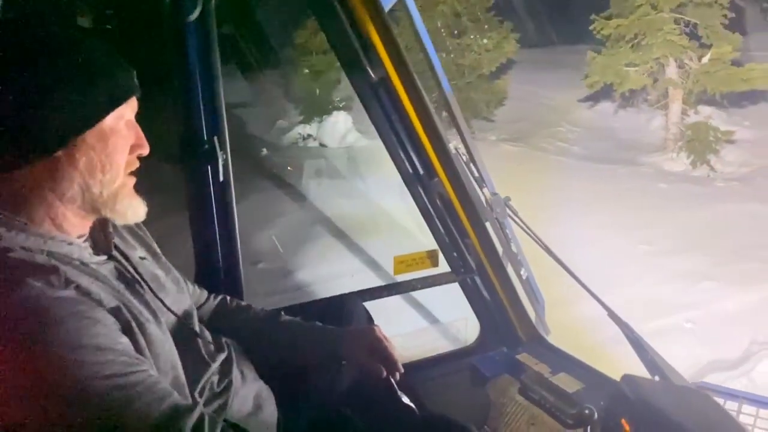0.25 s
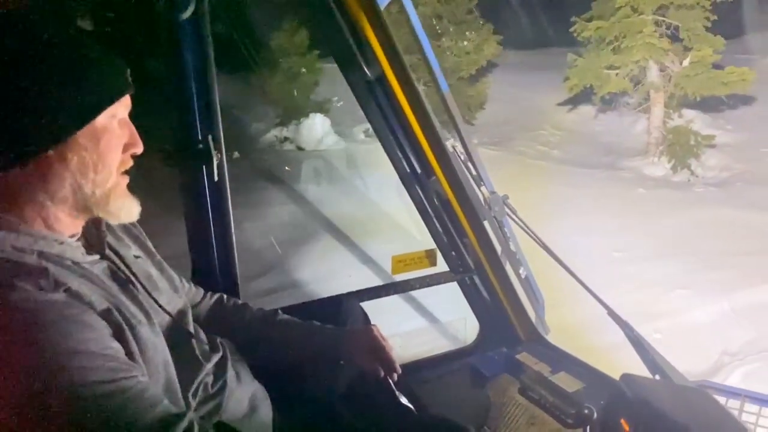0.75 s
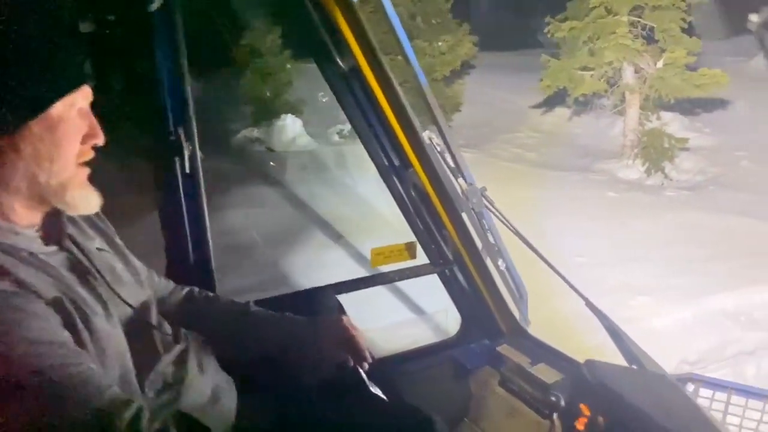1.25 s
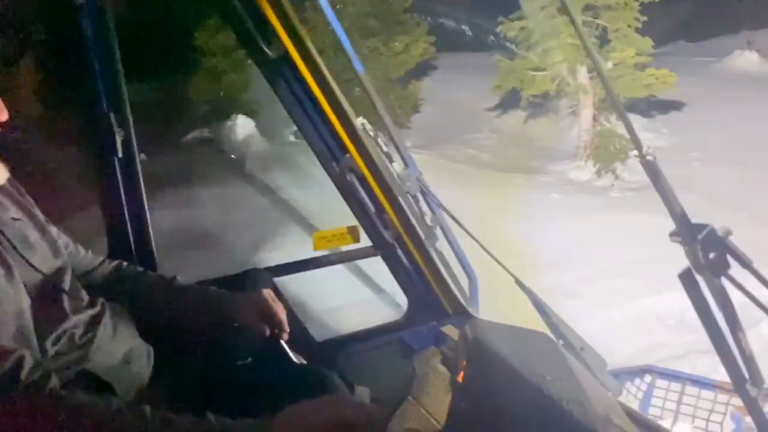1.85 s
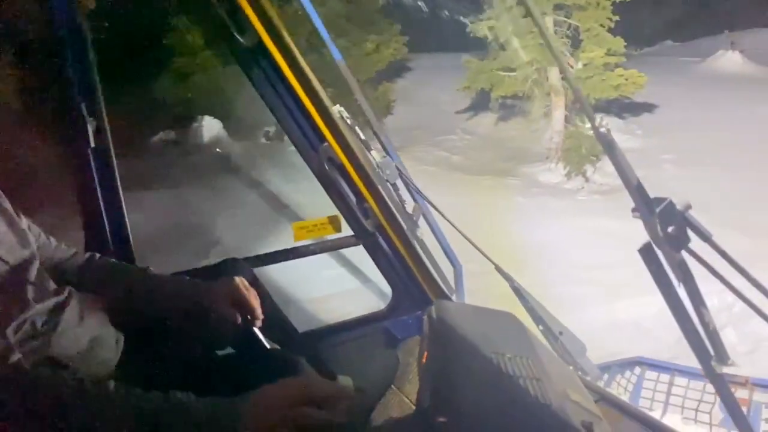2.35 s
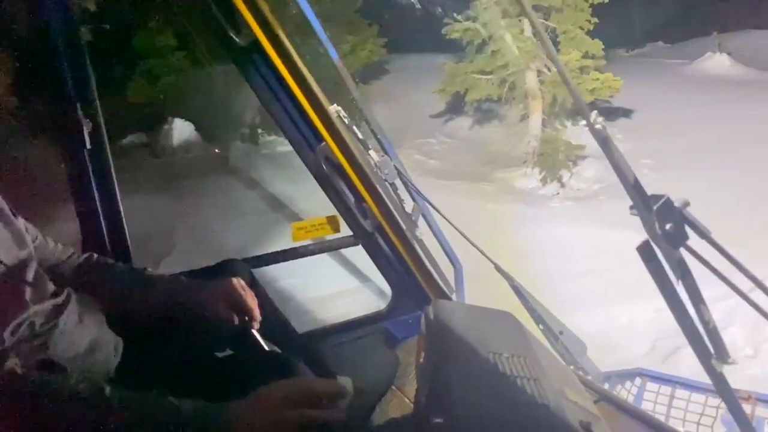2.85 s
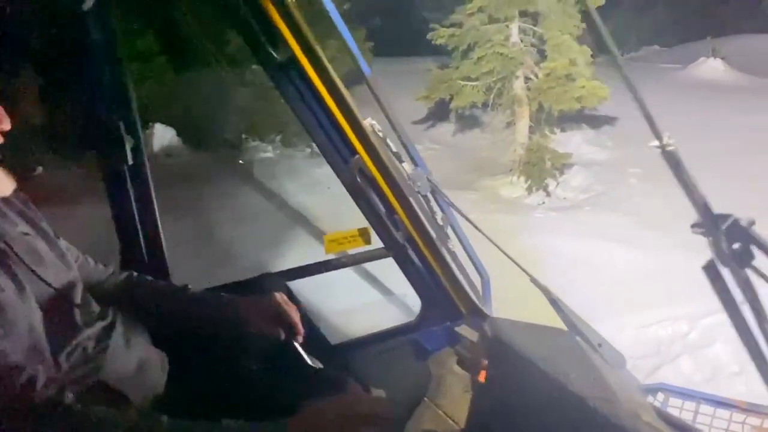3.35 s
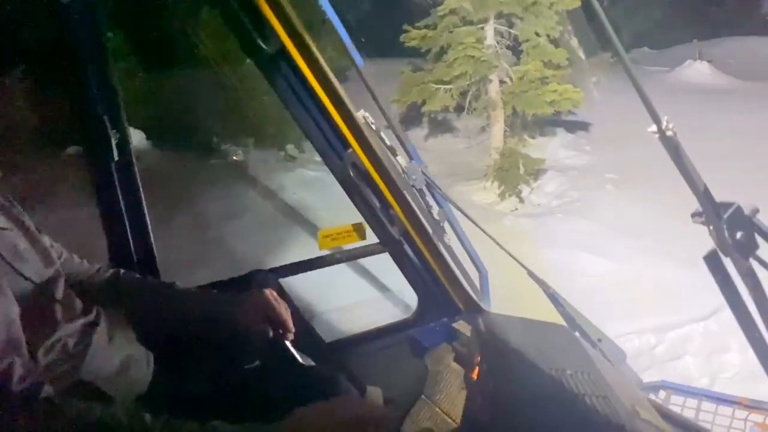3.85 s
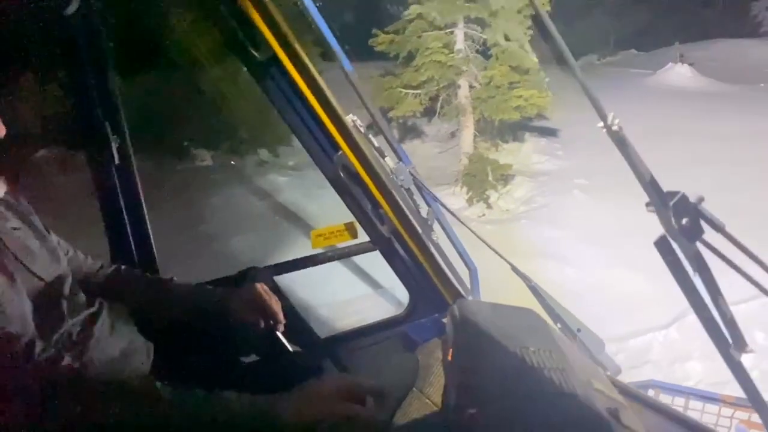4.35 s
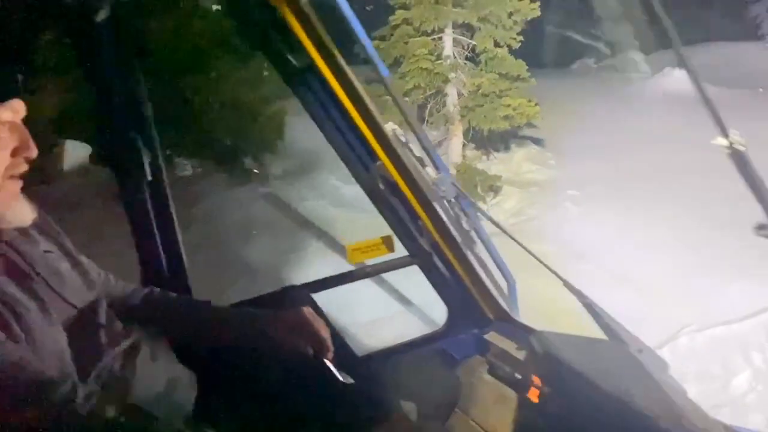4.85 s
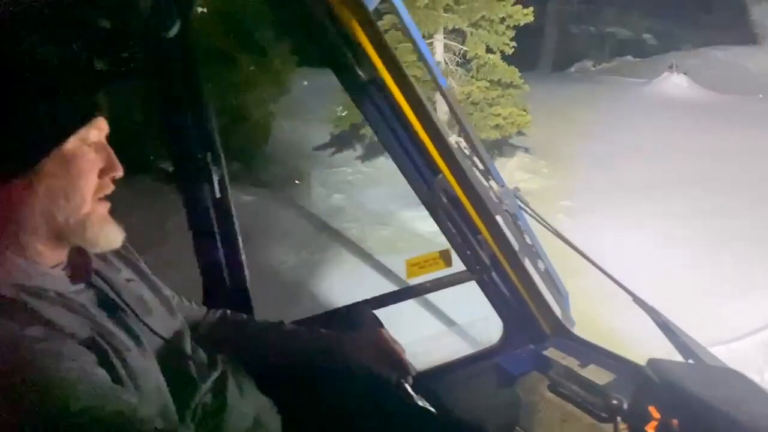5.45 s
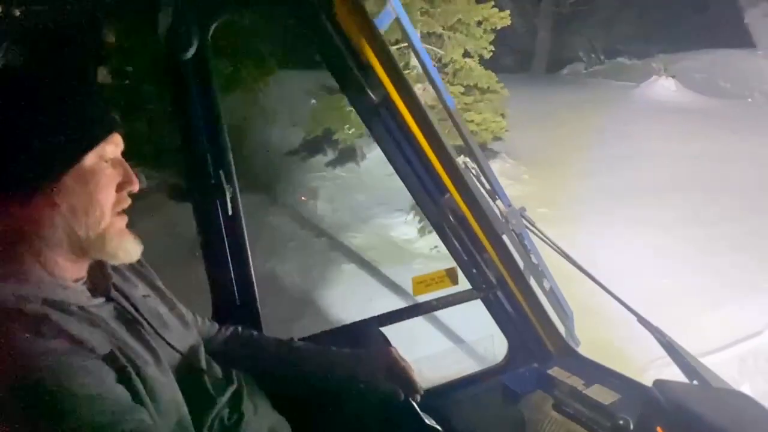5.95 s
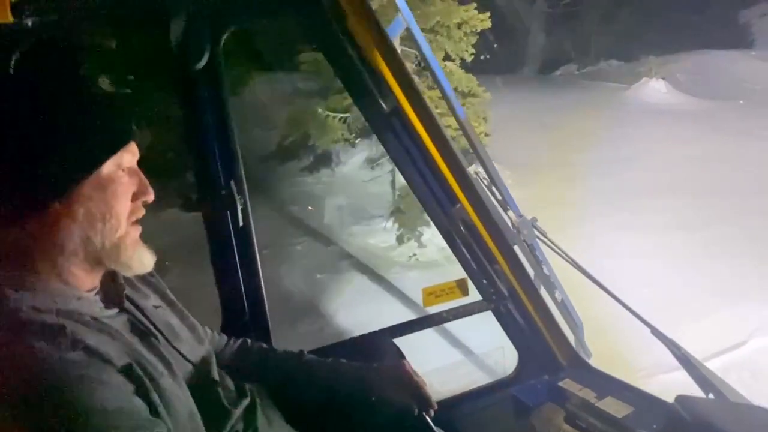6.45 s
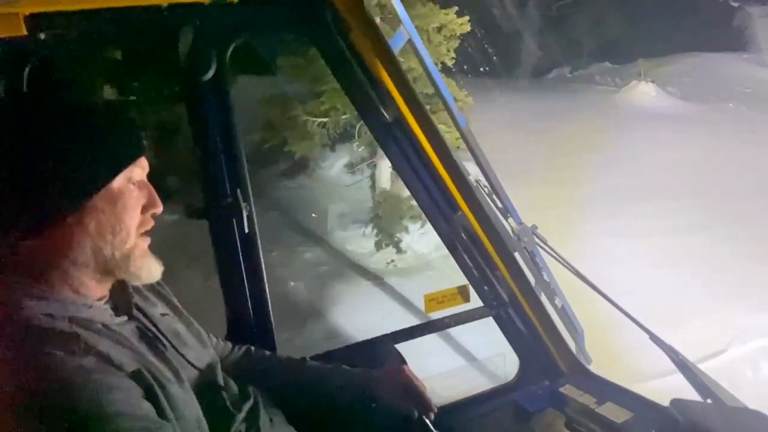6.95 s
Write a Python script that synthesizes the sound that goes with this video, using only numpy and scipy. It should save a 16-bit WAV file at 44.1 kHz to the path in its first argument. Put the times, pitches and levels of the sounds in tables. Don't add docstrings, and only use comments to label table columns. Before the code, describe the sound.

A steady low diesel drone fills an enclosed cab, knocking and clattering finely, with a faint whine and slow beating fans. Soft booms and thuds come through the floor. Cloth brushes close to the microphone, most often from two to six seconds, while a wiper motor hums underneath. Small switch clicks and a dull plastic panel knock come before the sharpest metallic snap, late in the stretch.

```python
import sys
import numpy as np
from scipy import signal
from scipy.fft import irfft
from scipy.io import wavfile
from scipy.ndimage import uniform_filter1d

SR = 44100
rng = np.random.default_rng(int(sys.argv[2]) if len(sys.argv) > 2 else 0)


def makeup_ratio(level_db):
    decades = np.asarray(level_db, float) / 20
    return 10 ** decades


def generate_wav(sig):
    pcm = np.round(np.clip(np.atleast_2d(sig).T, -1, 1) * 32767).astype(np.int16)
    wavfile.write(sys.argv[1], SR, pcm)


N = 317079
T = np.arange(N) / SR
COARSE_S = T[::16]

# time_s, speed_rpm
ENGINE_SPEED = [(0.0, 2088), (0.3, 2093), (1.3, 2097), (2.1, 2084), (2.9, 2082), (3.45, 2069), (4.1, 2079),
                (4.6, 2081), (5.1, 2065), (6.0, 2051), (6.6, 2074), (6.9, 2080), (7.19, 2080)]
# time_s, load_0_to_1
ENGINE_LOAD = [(0, 0.35), (1.5, 0), (2, 0.6), (2.5, 1), (3.3, 0.86), (4, 0.96), (4.6, 1), (5.2, 0.9),
               (5.55, 0.75), (5.8, 0.16), (6, 0.3), (7.19, 0.06)]
MEAN_RPM = 2080
FIRING, PUMP, EXHAUST = 6, 22, 9
# light_load_db, heavy_load_db, slope_db_per_10rpm, waver_db
MAIN_TONES = [
    (-23, -25, 1, 0.5),
    (-28, -31, -0.2, 1.05),
    (-29.5, -35, 0.7, 1.2),
]
# cycle_multiple, light_load_db, heavy_load_db
ENGINE_HARMONICS = [(1, -41, -47), (2, -34, -34), (4, -40, -41), (5, -44, -45), (7, -40, -38),
                    (8, -37, -36), (10, -42, -38), (11, -40, -39), (12, -45, -37), (13, -57, -47),
                    (14, -47, -44), (15, -39, -40), (16, -42, -54), (18, -44, -40), (20, -45, -32),
                    (21, -39, -41), (27, -49, -50), (28, -49, -51), (30, -46, -43), (31, -49, -56),
                    (32, -47, -42), (34, -48, -49), (38, -48, -41), (40, -56, -45), (41, -48, -46),
                    (42, -54, -46), (47, -53, -47), (56, -56, -48)]
# cycle_multiple, light_load_db, heavy_load_db
VALVE_TONES = [(39, -54, -46), (43, -51, -48), (44, -55, -47)]
VALVE_LOWEST, VALVE_HIGHEST, VALVE_KNOCK_S = 38, 44, 4.31
# pitch_hz, width_hz, level_db
BLOCK_MODES = [(570, 230, 0), (606, 72, -1.5), (737, 120, -6), (958, 22, -10.5), (1174, 41, -7.5),
               (1268, 29, -7.5), (1340, 190, -12), (1521, 46, -11), (1694, 46, -18), (2118, 53, -17),
               (2197, 22, -18.5), (2550, 48, -34), (2880, 36, -17)]

# cycle_multiple, light_load_db, heavy_load_db
CLATTER_LINES = [(26, -50, -52), (33, -49, -52), (49, -56, -53), (54, -55, -55), (58, -64, -55),
                 (60, -66, -54), (66, -54, -55), (68, -55, -56), (70, -56, -55), (71, -58, -60),
                 (72, -57, -58), (75, -58, -60), (77, -56, -59), (78, -56, -60), (79, -58, -62),
                 (80, -58, -61), (81, -58, -60), (82, -57, -62), (84, -57, -59), (87, -63, -59),
                 (88, -61, -58)]
FINE_LOWEST, FINE_END = 92, 150
FINE_LIGHT_DB, FINE_HEAVY_DB, FINE_SPREAD_DB = -68, -65, 3

# time_s, level_db
WHINE_DRIVE = [(0, -45), (1.6, -46), (2.2, -52), (3.6, -48), (4.5, -48), (4.95, -52), (5.2, -42),
               (5.45, -44), (5.68, -54), (5.85, -41), (6.1, -42), (6.4, -41), (6.75, -43), (7.19, -46)]
WHINE_MULTIPLES = 63, 64, 65
WHINE_PANEL_HZ, WHINE_PANEL_WIDTH_HZ = 1102, 9

# time_s, lead_turns
FAN_TURNS = [(-.05, 0), (3.98, 8), (7.3, 14)]
SLOW_FAN_HZ = 61.1

# time_s, level_db
WIPER_EFFORT = [(1.2, -45), (1.8, -28), (2.3, -24), (2.6, -20), (2.8, -24.5), (3.12, -21), (3.33, -23.5),
                (3.7, -21), (4.15, -20.5), (4.35, -23.5), (4.67, -18), (4.85, -22.5), (5.05, -19.5),
                (5.3, -27), (5.47, -20), (5.62, -24), (5.8, -32), (6.1, -40)]
WIPER_FREE_HZ, WIPER_SAG_HZ, WIPER_SLOWEST_S, WIPER_SAG_S = 189.6, 3.8, 3.95, 1.3
WIPER_OCTAVE_DB = -16.5

# time_s, peak_db, low_hz, high_hz, t60_s
TICKS = [(.008, -32, 1100, 3480, 0.03), (.912, -33, 10800, 11800, .03), (.9165, -32, 2300, 4600, .06),
         (.915, -31, 1500, 15000, 0.14), (.9255, -28, 2600, 4500, 0.045), (1.009, -33, 10800, 12500, .015),
         (1.999, -29, 6000, 11000, .02), (2.018, -27, 6500, 15000, .02), (2.0352, -18, 4200, 8500, 0.0089),
         (2.037, -33, 3000, 9000, 0.033), (2.092, -26, 12000, 15700, .01), (2.14, -28, 5000, 9000, .006),
         (2.204, -24, 1700, 2050, .05), (2.208, -31, 2000, 3000, .04), (2.685, -32, 10500, 15700, .12),
         (2.96, -25, 600, 1000, 0.07), (2.96, -28, 1000, 1600, .07), (2.961, -30, 1700, 3500, .07),
         (5.409, -28, 1890, 3200, 0.08), (5.615, -27, 1600, 2600, .09), (6.023, -24.5, 3500, 15500, 0.11),
         (6.027, -23, 1100, 3200, .07), (6.355, -24, 6000, 15500, .09), (6.357, -17.5, 1600, 15500, 0.1),
         (6.37, -10, 2300, 10000, 0.048), (6.372, -20, 9000, 15700, 0.042),
         (6.375, -13.5, 1600, 11000, 0.058), (6.377, -23.5, 1500, 2020, 0.07), (.918, -35, 1200, 2000, .12),
         (.921, -31, 3600, 4600, .04), (.9165, -32, 3500, 6000, .07), (.913, -33, 7800, 8600, .05),
         (6.3735, -15, 8800, 10200, .03), (2.207, -29, 1550, 2050, .06), (5.408, -25, 2200, 2450, .07)]
# time_s, level_db, low_hz, high_hz
CONTACTS = [(.0074, -4, 900, 3300), (.0076, -13, 3000, 6500), (2.0357, -2, 3900, 5500),
            (2.0358, -6, 9200, 11800), (2.0356, 4, 5600, 8600), (2.0355, 3, 12300, 15600),
            (2.1395, -8, 5000, 6500), (2.1395, -11, 7000, 9200), (2.0925, -14, 12500, 15700),
            (6.3702, -2, 2300, 14000), (6.3745, -5, 3000, 11000), (6.357, -12, 3000, 12000)]
# pitch_hz, tapped_db, snapped_db, t60_s
CATCH_MODES = [(1600, -1, -1, 0.054), (1704, -4, 2.5, 0.044), (2110, -12, -2, 0.053), (2200, -14, -1, .05),
               (2740, -14, -5, .05), (2470, -4, -2.5, 0.075), (2690, -5, -9, 0.062), (3000, -6, 3, 0.04),
               (3140, 1, -4, 0.05), (3370, 0.5, -4, 0.039), (3576, 3, 3, 0.045), (4160, -2, 1, 0.047),
               (4870, -10, -9, 0.05), (6420, -7, 1, 0.066), (6950, -10, 2, 0.04), (7560, -14, -1, 0.054),
               (8100, -7, -6, 0.039), (8250, -12, -3, 0.046), (9570, -9, -14, 0.064),
               (9600, -18, -13, 0.032)]
# time_s, level_db, snapped_0_or_1
CATCH_HITS = [
    (.913, -41, 0),
    (.9165, -30.5, 0),
    (.926, -38, 0),
    (6.358, -32, 1),
    (6.37, -25.5, 1),
    (6.374, -28, 1),
    (6.378, -34, 1),
]
# pitch_hz, level_db, t60_s
PANEL_MODES = [(645, -4, 0.12), (720, 3, .025), (770, -3, .04), (1420, -6, .015), (850, -3.5, 0.068),
               (1032, -3, 0.093), (1290, -6, 0.046), (1400, -6.5, 0.072), (1776, -14, .05),
               (2230, -16, .05)]
# time_s, level_db
PANEL_HITS = [
    (2.9614, -17),
    (2.967, -26),
    (2.9715, -25),
]
# pitch_hz, level_db, t60_s
SWITCH_MODES = [(1080, -21, .016), (1310, -19, .018), (1850, -21, .014), (2150, -26, .011),
                (3000, -23, .018), (5200, -30, .008)]
SWITCH_S = .0076

# pitch_hz, level_db_per_hz
CLOTH_SPECTRUM = [(880, -24), (1500, -10), (1980, -0.5), (2250, -6.5), (4000, -5.5), (5100, -5.5),
                  (6700, -2.5), (8600, -3.5), (11900, -9), (14900, -4.5), (16000, -5)]
# peak_s, level_db, rise_s, fall_s
CLOTH_STROKES = [(.056, -37.5, 0.22, 0.12), (.43, -44.5, 0.33, .08), (.56, -43.5, .12, .06),
                 (.68, -50, .1, .02), (1.35, -50, .15, .03), (1.68, -50, 0.54, .1),
                 (1.794, -42.5, 0.086, .08), (2.02, -41, 0.14, 0.036), (2.24, -36.5, 0.15, 0.097),
                 (2.32, -37, 0.033, 0.21), (2.53, -38, .1, 0.37), (2.69, -42.5, .05, .07),
                 (2.84, -35.5, 0.095, 0.27), (3.28, -36.5, 0.039, 0.089), (3.34, -34.5, .1, 0.35),
                 (3.85, -43, 0.19, 0.059), (3.94, -42.5, .07, 0.058), (4.04, -43, .04, .055),
                 (4.16, -48, .08, .04), (4.56, -44.5, 1.1, 0.14), (4.69, -41.5, .05, .08),
                 (4.75, -36.5, 0.088, .13), (5.13, -40, 0.13, 0.42), (5.49, -38, 0.25, 0.083),
                 (5.62, -36, 0.054, 0.13), (5.7, -44, .08, 0.056), (5.88, -39.5, 0.12, 0.087),
                 (6.02, -39, .09, 0.17), (6.78, -33, 0.15, 0.1), (6.858, -39, .1, 0.031),
                 (6.99, -46, .06, 0.089), (3.49, -41, .05, .05), (4.8, -43, .03, 0.028)]
# time_s, level_db
SHORT_SCUFFS = [(.272, -50), (1.01, -47), (1.072, -46), (2.09, -47), (4.22, -50), (6.252, -44), (6.34, -41),
                (7.041, -46), (7.185, -48)]
# time_s, tilt_db
SLEEVE_TILT = [(0, 6), (.08, 0), (.6, -1.5), (2.0, 0.5), (4.3, 0), (5.6, 2), (6.1, 2.5), (6.6, -2.5),
               (7.19, 4.5)]
SCUFF_RISE_S, SCUFF_FALL_S, CLOTH_BED_DB = 0.01, .025, -62
STROKE_DB = 12
ROUND_TOP = 0.15

# time_s, level_db, length_s
TRACK_THUDS = [(.51, -19, .08), (.99, -23, .12), (1.46, -29, .1), (1.8, -34, .4), (2.42, -24, .08),
               (2.7, -30, .5), (3.58, -22, .12), (4.41, -18, .3), (4.66, -21, .1), (4.815, -11, 0.05),
               (5.06, -19, .12), (5.328, -20, .08), (5.51, -21, .08), (6.23, -29, .2), (6.47, -27, .12),
               (7.05, -28, .4)]
# time_s, level_db, length_s
FLOOR_BOOMS = [(.1, -20, 1), (.66, -21, 0.15), (0.947, -22, 0.092), (1.34, -25.5, .2), (1.652, -23, .3),
               (1.905, -17.5, 0.17), (2.31, -20.5, .15), (2.6, -24, 0.7), (3.263, -20, 0.11),
               (3.573, -21, 0.1), (4.35, -26, 0.59), (4.73, -27, .07), (4.93, -24, 0.13),
               (5.255, -15, 0.14), (5.43, -26, .08), (5.57, -19, 0.091), (6.23, -21, 0.22),
               (6.41, -22, .06), (6.85, -25, 0.55)]
THUD_BED_DB, BOOM_BED_DB, FLOOR_DB = -45, -30.5, -2.5

# pitch_hz, level_db_per_hz
ROAR_SPECTRUM = [(14, -31), (40, -11.5), (85, -17.5), (125, -5.5), (190, -12.5), (230, -17.5), (370, -17),
                 (420, -21), (680, -23.5), (850, -30.5), (1030, -32), (1150, -31), (1400, -33.5),
                 (1600, -39), (2700, -40.5), (4200, -52.5)]
# pitch_hz, level_db_per_hz
AIR_SPECTRUM = [(2060, -28), (3500, -1), (4490, -2), (6740, -0.5), (12200, -9.5), (14500, -4), (15200, -5),
                (16000, -11)]
AIR_DB = -47.5
EDGE_HZ = 15870


def evened(x):
    return x / np.sqrt(np.mean(x ** 2) + 1e-20)


def steadied(x):
    return evened(x / (uniform_filter1d(x ** 2, size=3000) + 0.11) ** 0.5)


def curves(rows, t=T):
    s, *columns = np.transpose(rows)
    return [np.interp(t, s, c) for c in columns]


def drift(rate_hz, count):
    steps_s = np.arange(int(N / SR * rate_hz) + 3) / rate_hz
    return [np.interp(T, steps_s, row) for row in rng.standard_normal((count, len(steps_s)))]


def add(mix, s, sound):
    part = mix[round(s * SR):][:len(sound)]
    part += sound[:len(part)]


def tone(cycles, db):
    return np.sqrt(2) * makeup_ratio(db) * np.sin(2 * np.pi * cycles)


def resonate(x, hz, width_hz):
    r = np.exp(-np.pi * width_hz / SR)
    pole = r * np.exp(2j * np.pi * min(hz, .45 * SR) / SR)
    return 2 * signal.lfilter([1 - r], [1, -pole], x).real


def ring_modes(hz, db, t60_s, start_cycles):
    t = np.arange(6000)[:, None] / SR
    onset = np.minimum(t / 0.00067, 1)
    modes = makeup_ratio(db - 60 * t / t60_s) * np.sin(2 * np.pi * (hz * t + start_cycles))
    return (modes * onset).sum(axis=1)


def bandpass(x, low_hz, high_hz):
    return signal.sosfilt(signal.butter(3, [low_hz, high_hz], "band", fs=SR, output="sos"), x)


def noise(spectrum, size, patchy_db, shape_db=None):
    hop, hz = size // 4, np.fft.rfftfreq(size, 1 / SR)
    a, b, patches = rng.standard_normal((N // hop + 6, len(hz), 3)).T
    patches = uniform_filter1d(patches, size=9, axis=0)
    patches = evened(uniform_filter1d(patches, size=9, axis=1))
    f, level_db = np.transpose(spectrum)
    colour_db = np.interp(np.log(hz + 1), np.log(f + 1), level_db, left=-70, right=-90)
    db = colour_db[:, None] + patchy_db * patches
    if shape_db:
        db = db + shape_db(hz[:, None], np.arange(db.shape[1]) * hop / SR)
    return evened(signal.istft((a + 1j * b) * makeup_ratio(db), nperseg=size, noverlap=size - hop)[1][:N])


def strokes(rows, bed_db):
    power = makeup_ratio(bed_db) ** 2
    for s, db, rise_s, fall_s in rows:
        away = np.maximum((s - COARSE_S) / rise_s, (COARSE_S - s) / fall_s)
        away = np.hypot(away, ROUND_TOP) - ROUND_TOP
        power = power + makeup_ratio(db - STROKE_DB * away) ** 2
    return np.interp(T, COARSE_S, np.sqrt(power))


def engine_state():
    rpm = curves(ENGINE_SPEED)[0]
    load = np.clip(curves(ENGINE_LOAD)[0], 0, 1)
    return rpm, load, np.cumsum(rpm) / 120 / SR


def engine():
    rpm, load, cycle = engine_state()
    firing_db, pump_db, exhaust_db = [
        light_db + load * (heavy_db - light_db) + slope_db * (rpm - MEAN_RPM) / 10 + waver_db * w
        for (light_db, heavy_db, slope_db, waver_db), w in zip(MAIN_TONES, drift(3.0, count=3))]
    pump_db = pump_db + 0.71 * load * drift(16.0, count=1)[0]
    out = tone(FIRING * cycle, firing_db) + tone(PUMP * cycle, pump_db) + tone(EXHAUST * cycle, exhaust_db)
    rows = list(ENGINE_HARMONICS) + list(VALVE_TONES)
    wander, start = drift(6.0, count=len(rows)), rng.random(len(rows))
    for (k, light_db, heavy_db), w, phase in zip(rows, wander, start):
        if VALVE_LOWEST <= k <= VALVE_HIGHEST:
            phase = .25 - k * cycle[round(VALVE_KNOCK_S * SR)] + .2 * w
            w = .25 * wander[-1] + .8 * w
        unsteady_db = (1 + k / 40) * w
        out += tone(round(k) * cycle + phase, light_db + load * (heavy_db - light_db) + unsteady_db)
    return out


def block_knock():
    _, load, cycle = engine_state()
    firing = np.floor(cycle * FIRING).astype(int)
    at = np.flatnonzero(np.diff(firing)) + 1
    strength = makeup_ratio(2.0 * rng.standard_normal(len(at)))
    delay = rng.integers(0, 3, len(at))
    paths = rng.standard_normal((FIRING, 900)) * np.exp(-np.arange(900) / 260.)
    knocks = np.zeros(N)
    for c, cylinder_db in enumerate([0, -3, -1.5, -4, -1.2, -3]):
        train = np.zeros(N)
        mine = firing[at] % FIRING == c
        train[at[mine] - delay[mine]] = strength[mine]
        knocks += makeup_ratio(cylinder_db) * signal.oaconvolve(train, paths[c])[:N]
    ringing = np.zeros(N)
    for hz, width_hz, db in BLOCK_MODES:
        ringing += makeup_ratio(db) * evened(resonate(resonate(knocks, hz, width_hz), hz, 2 * width_hz))
    return makeup_ratio(-38.0 + 1.2 * load) * evened(ringing)


def clatter():
    _, load, cycle = engine_state()
    multiples = range(FINE_LOWEST, FINE_END)
    spread_db = FINE_SPREAD_DB * rng.standard_normal(len(multiples))
    fine = [(k, FINE_LIGHT_DB + d, FINE_HEAVY_DB + d) for k, d in zip(multiples, spread_db)]
    k, *levels_db = np.transpose(list(CLATTER_LINES) + fine)
    lines = np.zeros((2, 2, 2049), complex)
    phases = np.exp(2j * np.pi * rng.random((2, len(k))))
    lines[:, :, k.astype(int)] = makeup_ratio(np.array(levels_db))[:, None] * phases
    cycles = irfft(lines) * 4096 / np.sqrt(2)
    grid = np.arange(4096) / 4096
    (light_a, light_b), (heavy_a, heavy_b) = [
        [np.interp(cycle % 1, grid, one, period=1) for one in pair] for pair in cycles]
    blend = .35 * drift(2.5, count=1)[0]
    version_a = light_a + load * (heavy_a - light_a)
    version_b = light_b + load * (heavy_b - light_b)
    return np.cos(blend) * version_a + np.sin(blend) * version_b


def whine():
    rpm, _, cycle = engine_state()
    drive_db = curves(WHINE_DRIVE)[0]
    out = np.zeros(N)
    for k, flutter in zip(WHINE_MULTIPLES, drift(8.0, count=3)):
        detuning = (k * rpm / 120 - WHINE_PANEL_HZ) / WHINE_PANEL_WIDTH_HZ
        off_db = 10 * np.log10(1 + detuning ** 2)
        out += tone(k * cycle, drive_db - off_db + 1.5 * flutter)
    return out


def fans():
    slow = SLOW_FAN_HZ * T
    gained = curves(FAN_TURNS)[0] + .5
    a, b = drift(1.0, count=2)
    return tone(slow, -27.5 + a) + tone(slow + gained, -27 + b)


def wiper():
    hz = WIPER_FREE_HZ - WIPER_SAG_HZ * np.exp(-((T - WIPER_SLOWEST_S) / WIPER_SAG_S) ** 2)
    db = curves(WIPER_EFFORT)[0]
    turns = np.cumsum(hz) / SR
    octave = tone(2 * turns, db + WIPER_OCTAVE_DB)
    return octave + tone(turns, db + 1.5 * drift(26.0, count=1)[0])


def clicks():
    out, t = np.zeros(N), np.arange(6000) / SR
    hisses = rng.standard_normal((len(TICKS), len(t)))
    for (s, db, low_hz, high_hz, t60_s), hiss in zip(TICKS, hisses):
        gain = makeup_ratio(db - 6 - 60 * t / t60_s) * np.minimum(t / .0002, 1)
        add(out, s, gain * evened(bandpass(hiss, low_hz, high_hz)))
    for s, db, low_hz, high_hz in CONTACTS:
        add(out, s, makeup_ratio(db) * bandpass(1. * (t == 0), low_hz, high_hz))
    hz, tap_db, snap_db, t60_s = np.transpose(CATCH_MODES)
    for s, db, snapped in CATCH_HITS:
        mode_db = snap_db if snapped > .5 else tap_db
        add(out, s, ring_modes(hz, db + mode_db, t60_s, rng.random(len(hz))))
    add(out, SWITCH_S, ring_modes(*np.transpose(SWITCH_MODES), 0))
    hz, mode_db, t60_s = np.transpose(PANEL_MODES)
    for s, db in PANEL_HITS:
        add(out, s, ring_modes(hz, db + mode_db, t60_s, .5 + .1 * rng.random(len(hz))))
    return out


def rustle():
    scuffs = [(s, db, SCUFF_RISE_S, SCUFF_FALL_S) for s, db in SHORT_SCUFFS]

    def tilt_db(hz, t):
        return curves(SLEEVE_TILT, t)[0] * np.clip(np.log2(8000 / (hz + 1)), -1, 2)

    weave = makeup_ratio(1.2 * drift(45.0, count=1)[0])
    hiss = noise(CLOTH_SPECTRUM, size=256, patchy_db=1.0, shape_db=tilt_db)
    return strokes(list(CLOTH_STROKES) + scuffs, CLOTH_BED_DB) * weave * hiss


def floor():
    thud = steadied(noise([(24, -17), (34, -14), (50, 5), (57, 3)], size=8192, patchy_db=8.5))
    boom = steadied(noise([(66, -11), (72, 4), (90, -6.5), (100, -0.5)], size=8192, patchy_db=1.0))
    thud_gain = strokes([(s, db, length_s, length_s) for s, db, length_s in TRACK_THUDS], THUD_BED_DB)
    boom_gain = strokes([(s, db, length_s, length_s) for s, db, length_s in FLOOR_BOOMS], BOOM_BED_DB)
    return makeup_ratio(FLOOR_DB) * (thud_gain * thud + boom_gain * boom)


def cab_roar():
    def hull_db(hz, t):
        load = curves(ENGINE_LOAD, np.maximum(t, 2.5))[0]
        return 2.9 * (load - 1) * np.exp(-(np.log2(hz / 200 + 1e-9) / 0.29) ** 2)

    return makeup_ratio(-23.5) * noise(ROAR_SPECTRUM, size=4096, patchy_db=1.5, shape_db=hull_db)


def air():
    return makeup_ratio(AIR_DB) * noise(AIR_SPECTRUM, size=512, patchy_db=1.3)


def scene():
    machinery = engine() + block_knock() + clatter() + whine() + fans() + wiper()
    return (machinery + clicks() + rustle() + floor() + cab_roar() + air())[None]


def low_pass(x):
    return signal.sosfilt(signal.butter(12, 15800, fs=SR, output="sos"), x)


def record(dry):
    edge = signal.firwin(511, EDGE_HZ, window=("kaiser", 9), fs=SR)
    limited = np.tanh(dry * 1.082) / 1.104
    mix = signal.oaconvolve(limited, edge[None], "same")
    return low_pass(mix)


dry = scene()
out = record(dry)
generate_wav(out)
```